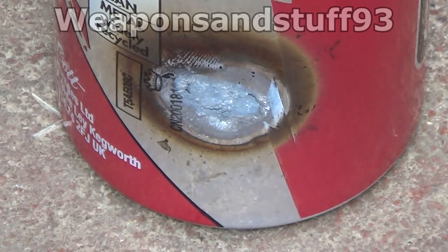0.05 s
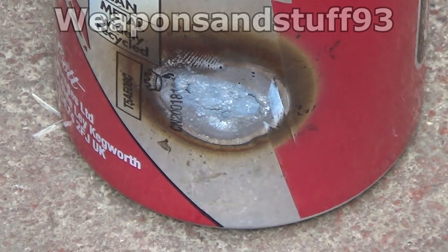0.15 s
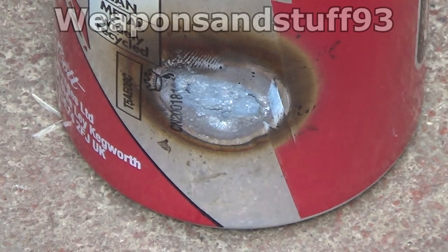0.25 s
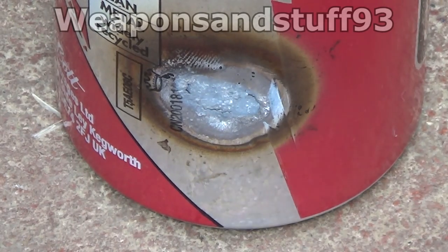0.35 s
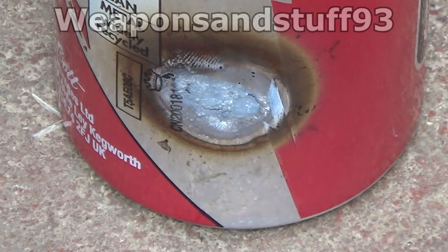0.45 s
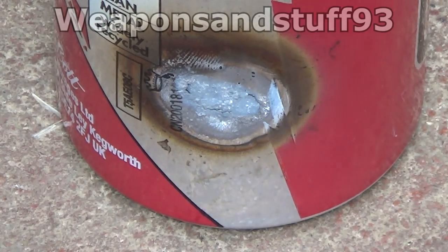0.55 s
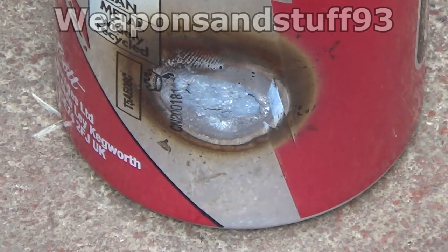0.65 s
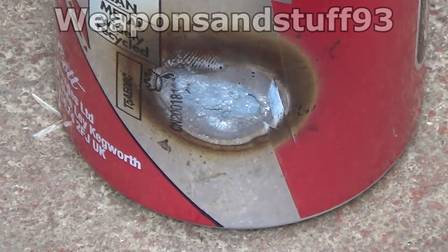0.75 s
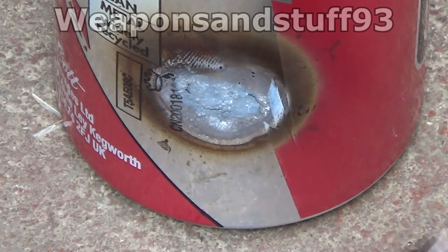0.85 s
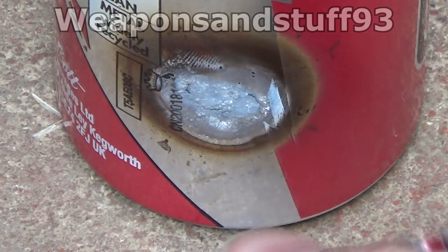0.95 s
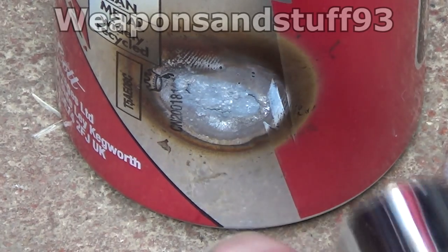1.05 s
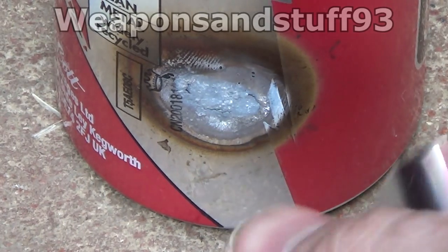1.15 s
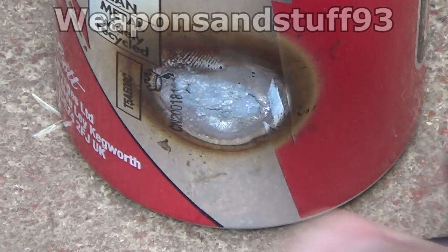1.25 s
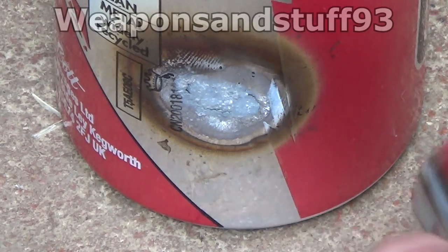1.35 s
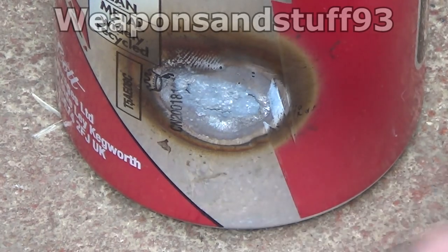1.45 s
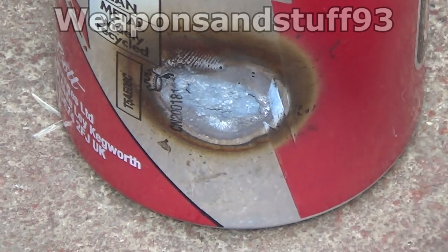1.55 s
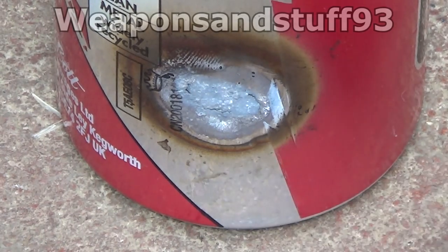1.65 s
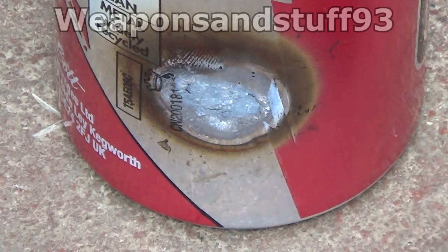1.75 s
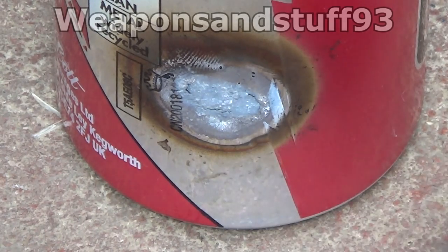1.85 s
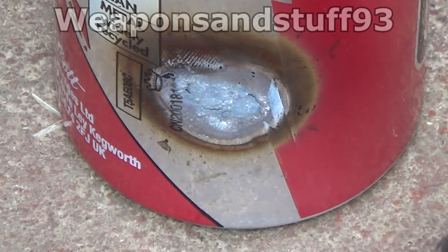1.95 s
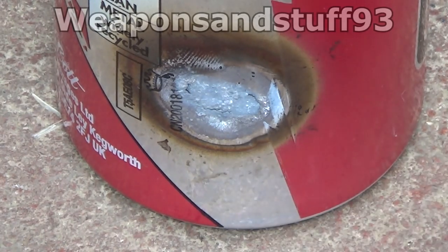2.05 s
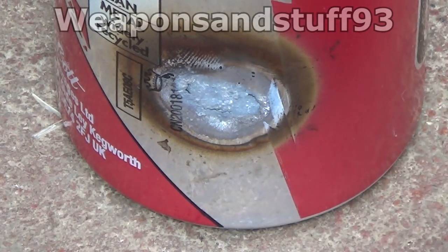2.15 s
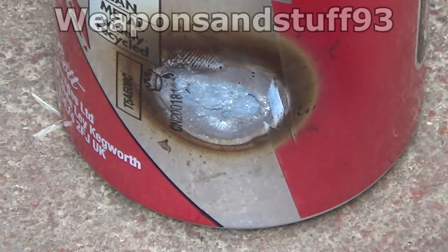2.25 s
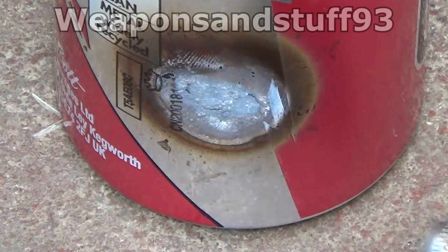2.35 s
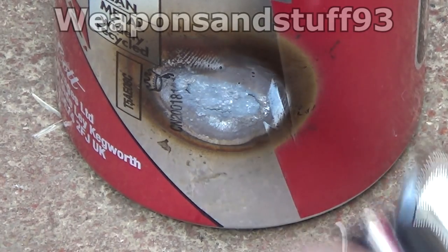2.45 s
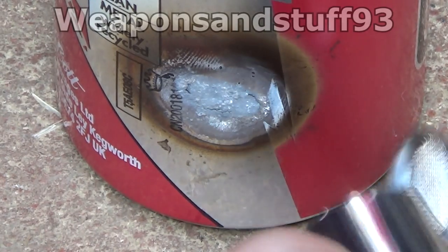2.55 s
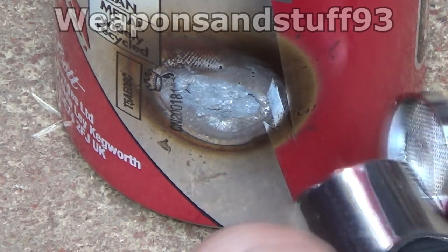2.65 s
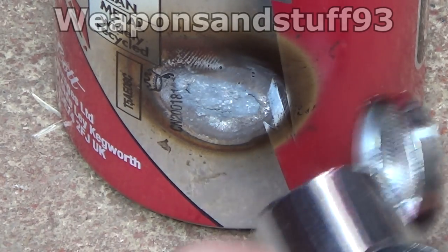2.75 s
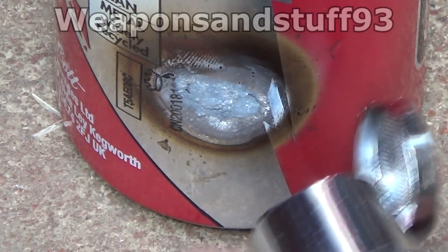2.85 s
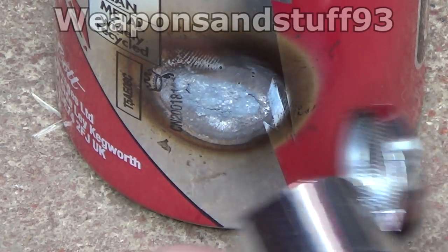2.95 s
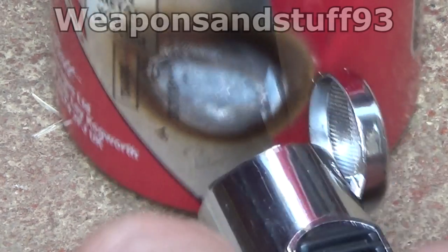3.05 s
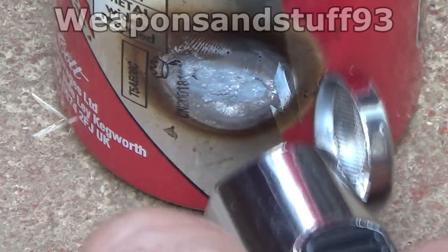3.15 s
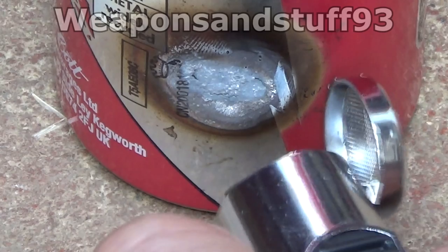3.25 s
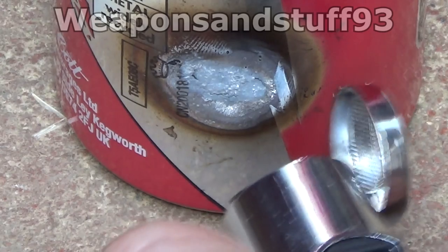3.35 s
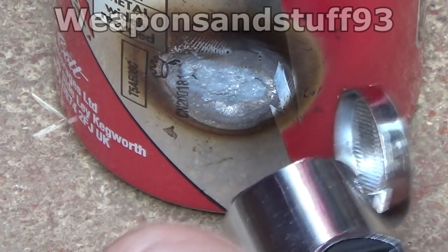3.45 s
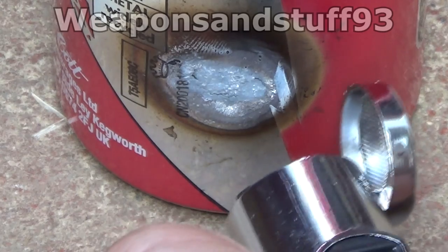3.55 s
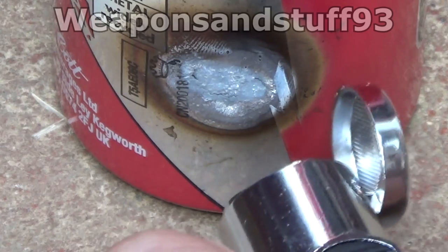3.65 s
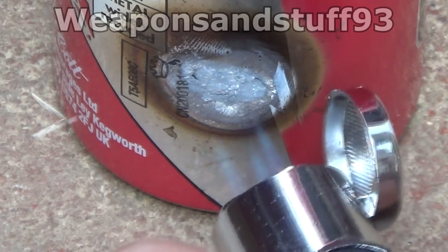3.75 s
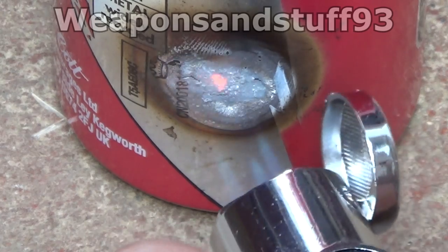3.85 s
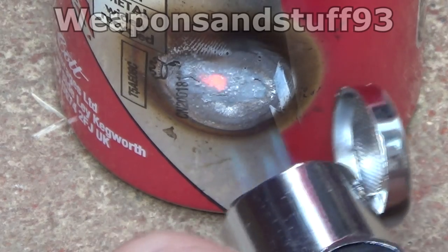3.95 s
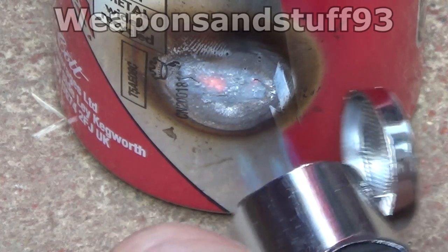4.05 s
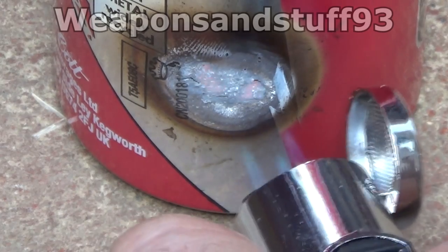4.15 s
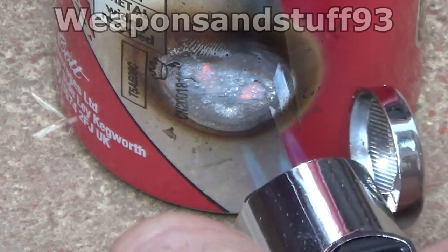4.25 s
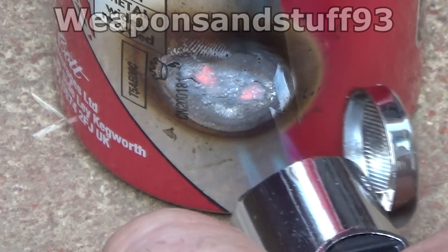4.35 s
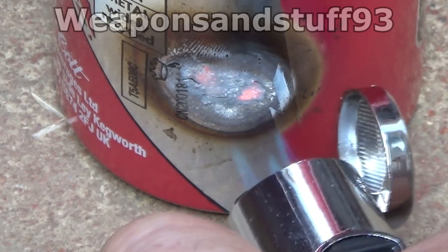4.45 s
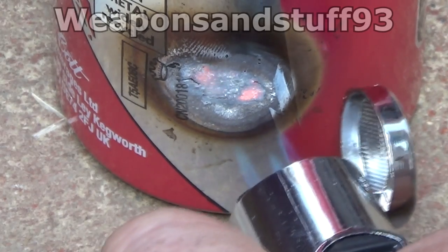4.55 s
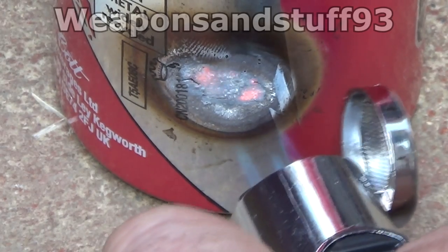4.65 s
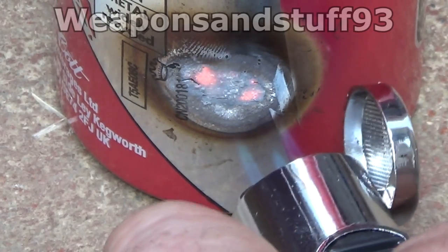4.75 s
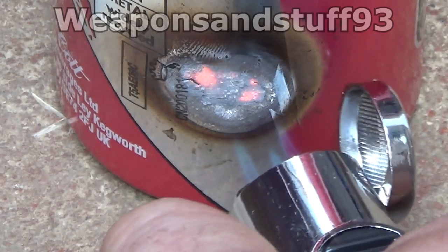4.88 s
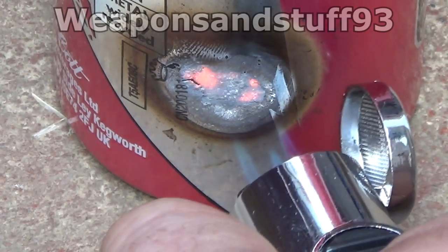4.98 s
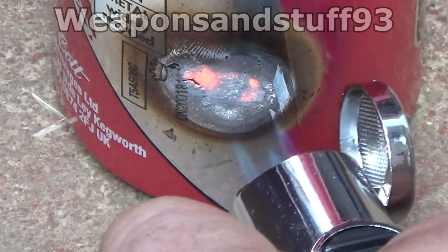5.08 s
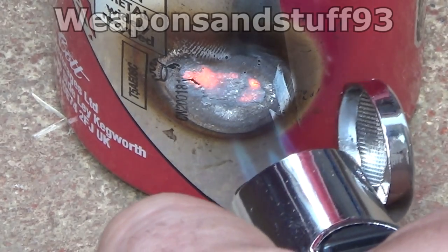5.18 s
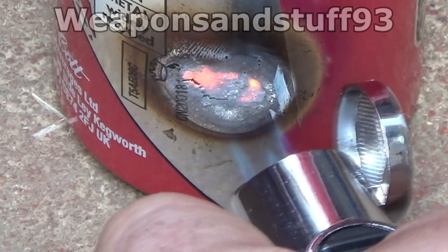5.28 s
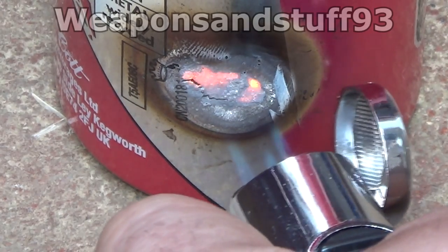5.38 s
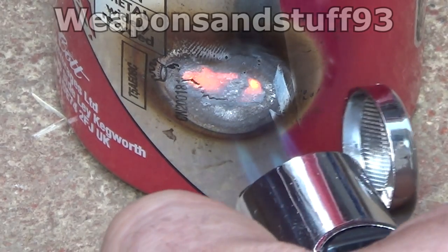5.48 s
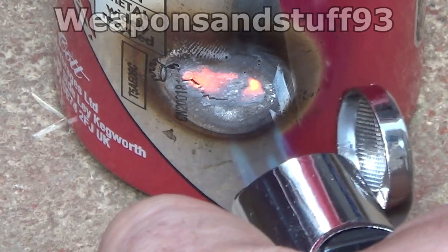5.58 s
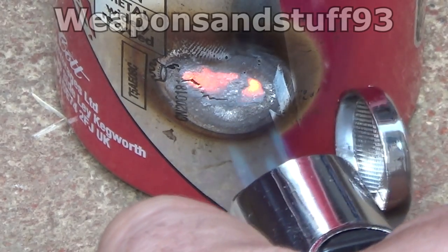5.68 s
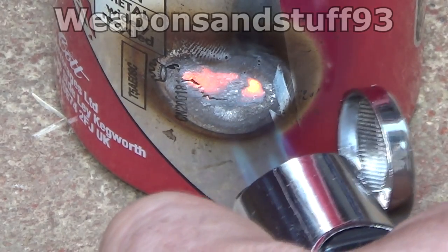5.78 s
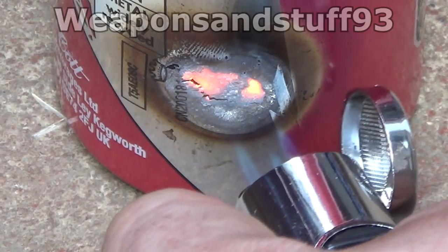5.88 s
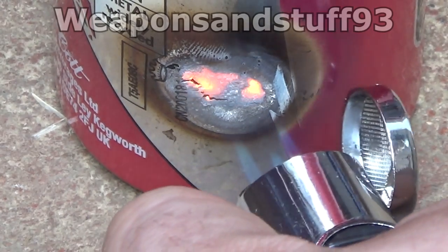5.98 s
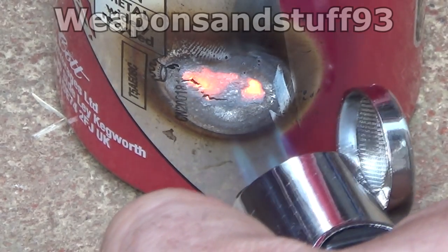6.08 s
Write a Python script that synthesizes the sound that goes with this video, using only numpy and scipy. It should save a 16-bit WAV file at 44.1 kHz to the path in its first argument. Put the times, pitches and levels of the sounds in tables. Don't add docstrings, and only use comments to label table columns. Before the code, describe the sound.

Soft rustling fades over a distant traffic bed while a camera lens motor ticks very faintly. Small dry metallic clicks come irregularly, then a metal lid flicks open with a clattering bounce and brief ring. A thin gas hiss follows, a sharp ignition crackles, and a torch lighter burns with a dense, breathy hiss against a can, close to the microphone.

```python
import sys
import numpy as np
from scipy import signal
from scipy.fft import rfft, irfft, next_fast_len
from scipy.io import wavfile
from scipy.ndimage import uniform_filter1d

SR = 44100
rng = np.random.default_rng(int(sys.argv[2]) if len(sys.argv) > 2 else 0)


def wrap_up_sound(samples):
    columns = np.atleast_2d(samples).T
    tamed = np.clip(columns, -1, 1)
    steps = np.round(tamed * 32767).astype(np.int16)
    wavfile.write(sys.argv[1], SR, steps)


def invert_db(x):
    u = np.asarray(x, float) / 20
    return 10 ** u


N = 269936
T = np.arange(N) / SR
HZ = np.maximum(np.fft.rfftfreq(next_fast_len(N, real=True), 1 / SR), 1)

# time_s, level_db
TRAFFIC = [
    (0, -51.5),
    (1.7, -54.5),
    (2.1, -52),
    (3.0, -53),
    (3.4, -56.5),
    (3.9, -53),
    (5.3, -50.5),
    (5.85, -48),
    (6.12, -49.5),
]
# time_s, above_rest_db
HAND = [(0, 18.5), (.27, 12), (.63, 13.5), (.75, 8), (.83, 1.5), (1.0, 2), (1.45, 0), (1.68, 2), (1.82, 0),
        (2.03, -2.5), (2.3, -0.5), (2.5, 2.5), (2.95, 1.5), (3.08, -0.5), (3.3, 1.5), (3.8, -1.5)]
# rest_db, slope_db_per_db, max_growth_db
RUSTLE = [
    (-58, 1.07, 9.5),
    (-63, 1.15, 25),
    (-67.5, 1.17, 25),
]
# freq_hz, level_db
AROUND_COLOUR = [(12, -45), (20, -14.5), (55, -4.5), (127, -14.5), (146, -27), (255, -16.5), (377, -21),
                 (574, -19), (1150, -27), (2300, -26), (3160, -31.5), (4180, -31.5), (4940, -29.5),
                 (9950, -21), (16000, -36.5)]
PING_FRAMES = [7, 8, 12, 13, 14, 22, 23, 24, 25, 54, 56, 77, 85, 91]
# start_s, length_s, first_hz, last_hz, level_db
SQUEAK = [(1.06, .03, 4900, 5150, -74), (1.22, 0.049, 5150, 5250, -81), (1.285, .045, 5450, 5260, -72),
          (1.333, 0.061, 5270, 5370, -71), (1.413, .045, 4980, 4850, -74), (1.492, 0.082, 5110, 5190, -68),
          (1.59, 0.04, 5160, 5000, -70), (1.642, 0.029, 5040, 5300, -71), (1.685, .06, 5200, 4850, -68),
          (1.75, .03, 4880, 4900, -69), (1.07, .05, 11800, 13300, -80), (1.57, .09, 13050, 12900, -81)]
# start_s, peak_db, centre_hz, ring_db
TICKS = [(0.6405, -28.5, 1620, -15), (0.82, -21, 5600, -14), (0.852, -35, 1500, -15),
         (0.9003, -40, 4110, -12), (0.9526, -37, 3040, -11), (1.0814, -35.5, 2470, -18),
         (1.1003, -27.5, 5650, -24), (1.1638, -42, 2500, -6), (1.3956, -26.5, 4240, -0.5),
         (1.4546, -47, 2010, -12), (1.555, -35.5, 2950, -21), (1.607, -42.5, 2980, -14),
         (1.6294, -46, 5040, -14), (1.6754, -46, 5190, -17), (1.759, -38, 1800, -11),
         (1.7777, -32.5, 4120, -6), (1.798, -35.5, 4140, -14), (1.923, -45, 2970, -12),
         (1.9581, -41, 3440, -16), (2.013, -35, 9800, -4), (2.0494, -44, 3980, -13), (2.08, -37, 4140, -11),
         (2.103, -44, 4140, -9.5), (2.1994, -34, 4120, -6.5), (2.341, -42, 1790, -8),
         (2.35, -31.5, 2430, -8.5), (2.4264, -45, 2460, -8), (2.4418, -39, 3560, -18)]
# freq_hz, level_db, t60_s
SHELL = [(2500, -7.5, 0.032), (4120, -6.5, 0.04), (5870, -8.5, 0.028), (7160, -14, .03), (9900, -2, 0.025)]
# start_s, peak_db, rattle_t60_s, treble_db, bass_db
CAP = [
    (3.113, -20.5, 0.12, -9, -21),
    (3.121, -28, 0.11, -16, -6),
    (3.134, -27.5, 0.1, -15, -13),
    (3.147, -34.5, 0.27, -14, -14),
    (3.197, -28, 0.14, -16, -3.5),
]
# freq_hz, level_db, t60_s
CAN = [(586, 1, .18), (900, -1.5, 1), (1295, 1, 0.67), (1650, 12, 0.24), (2143, -6, 0.46),
       (2340, -12, 0.25), (2410, 1, 0.27), (2750, -8, 0.23), (3418, -13, 0.34), (4340, -11, .25),
       (4400, -6, 0.092), (5577, -15, .3)]
# freq_hz, level_db
CAP_COLOUR = [(88, -41), (150, -16), (662, 1), (745, -13), (854, -3), (1870, -11.5), (2360, 2),
              (3100, -13.5), (4320, -15), (9440, -19.5), (16000, -55)]
# middle_s, half_length_s, level_db
WISPS = [
    (1.396, 0.032, -63),
    (1.525, 0.033, -58),
    (1.623, .02, -73),
    (1.86, 0.046, -62),
    (2.35, .03, -62),
    (2.89, 0.087, -60),
    (3.05, 0.061, -65),
]
# freq_hz, level_db
WISP_COLOUR = [(4500, -22), (7000, -9), (9500, -5), (11500, -11), (15000, -30)]
# freq_hz, level_db
GAS_COLOUR = [(2000, -24), (2700, -8), (3150, -13), (3540, 3), (3830, -9), (4090, -1), (4700, -8),
              (5400, 0), (7200, 0), (7650, -5), (8300, 2), (9700, 2), (10900, -3), (11300, -10)]
# start_s, peak_db, throat_db, t60_s
SPUTTER = [
    (3.8262, -1, -12.5, 0.05),
    (3.8394, -2.5, -9, 0.062),
    (3.8528, -8, -6, 0.057),
    (3.8598, -20, 7, 0.06),
    (3.87, -17, 0, 0.053),
]
# time_s, level_db
CATCH = [
    (3.828, -35),
    (3.86, -19),
    (3.934, -48),
    (4.0, -46),
]
# freq_hz, level_db
CATCH_COLOUR = [(530, -56), (900, -23), (1120, -27), (1530, -23.5), (1720, -21), (2300, -2), (3910, -20),
                (5220, -9), (6640, -11.5), (7960, -3.5), (9420, -0.5), (14200, -28), (16000, -54)]
# time_s, flow_db
FLAME = [
    (3.89, 1.5),
    (4.2, 1.27),
    (5.0, 2.5),
    (5.09, 4),
    (5.37, 3.5),
    (5.5, 4.5),
    (5.84, 3.5),
    (6.12, 3),
]
# level_db, slope_db_per_flow_db, flare_db, dip_db
JETS = [
    (-41, 1.04, 6, -4),
    (-42.5, .75, 2.5, 0.5),
    (-53.5, 1.11, 19, -20),
]
# freq_hz, level_db
FLAME_COLOUR = [(120, -29), (240, -11), (440, -13), (730, -12.5), (930, -10), (1100, -1), (1500, -7.5),
                (2060, -1), (3150, -11), (7200, -6.5), (7700, -10), (9700, -20), (13500, -25.5),
                (16000, -41)]
# freq_hz, width_hz, boost_db
RINGS = [(1100, 120, 2), (1246, 14, 6), (1540, 40, 1.5), (1657, 38, 8), (1766, 22, 8), (2144, 59, 3.5),
         (2290, 48, -1.5), (2643, 170, 6), (3550, 79, 7.5), (4120, 170, 4.5), (5270, 200, 3.5),
         (5900, 160, 2), (7670, 110, -9), (10750, 880, 7.5)]
# freq_hz, side_minus_mid_db
SIDE_NEAR = [(60, -34), (110, -6), (200, -16), (380, -16), (700, -9.5), (1290, -14.5), (2380, -6.5),
             (4400, -9), (8120, -13), (15000, -18)]
# freq_hz, side_minus_mid_db
SIDE_FAR = [(60, -44), (110, -5), (200, -19), (380, -13), (700, -9.5), (1290, -3.5), (2380, -3.5),
            (4400, -6), (8120, -5), (15000, -27)]
# freq_hz, side_minus_mid_db
SIDE_SPARK = [(60, -26), (110, -19), (200, -27), (380, -19), (700, -12), (1290, -12), (2380, -8),
              (4400, -9), (8120, -11), (15000, -25)]

ROOM_T60_S, ROOM_DB = 0.19, -7
DRONE_HZ, DRONE_DB, DRONE_STOPS_S, DRONE_SAG_HZ, DRONE_SAG_S = 61, -48, 1.72, 8.7, 0.26
HAND_PAN_DB, BUSY_PAN_DB = -1.5, -1
LEAK_S, LEAK_RISE_S, LEAK_DB = 2.37, 0.6, 5.5
FRAME_S, FIRST_STEP_S = 0.04, 0.012
PING_DB, PING_HZ, PING_SAG_HZ_PER_S = -51.5, 2940, 48
EDGE_TRIM_DB = 5
GRIP_PAN_DB, LID_PAN_DB, LID_ABOVE_HZ = -2.2, 1.2, 3750
CRACK_DB = -10
SEEP_FROM_S, SEEP_TO_S, SEEP_DB, SEEP_GROWTH_DB = 3.22, 3.815, -51.5, 2.5
FLARE_S, SETTLE_S, FLAME_PAN_DB = 0.0083, 0.054, 0.8
TOP_HZ, PREAMP_DB = 15700, -70


def unit(x):
    return x / np.sqrt(np.mean(x ** 2))


def noise():
    return rng.standard_normal(N)


def sieve(x, gain):
    size = next_fast_len(N, real=True)
    return irfft(rfft(x, size) * gain, size)[:N]


def shape(x, points):
    hz, db = np.transpose(points)
    return sieve(x, invert_db(np.interp(np.log(HZ), np.log(hz), db)))


def split(x, edges_hz):
    lows = [1 / (1 + (HZ / edge) ** 6) for edge in edges_hz] + [1]
    return [sieve(x, high - low) for low, high in zip([0] + lows, lows)]


def curves(rows, fade=0.01):
    s, *columns = np.transpose(rows)
    gate = np.clip(np.minimum(T - s[0], s[-1] - T) / fade + 1, 0, 1)
    return [gate] + [np.interp(T, s, column) for column in columns]


def walk(rate):
    k = int(SR / rate)
    held = np.repeat(rng.standard_normal(N // k + 1), k)
    return uniform_filter1d(uniform_filter1d(held, k), k)[:N]


def fall(t60, seconds=0.41):
    t = np.arange(int(seconds * SR)) / SR
    return t, np.exp(-np.log(1000) * t / max(t60, 0.003))


def ring(modes, seconds=0.41):
    out = 0
    for hz, db, t60 in modes:
        t, env = fall(t60, seconds)
        env = env * np.minimum(t * hz / 2, 1)
        strength = invert_db(db + 3.8 * rng.standard_normal())
        out = out + strength * env * np.sin(2 * np.pi * (hz * t + rng.random()))
    return out


def burst(low_hz, high_hz, t60):
    t, env = fall(t60)
    band = signal.butter(3, [low_hz, min(high_hz, 14000)], "bandpass", fs=SR, output="sos")
    y = signal.sosfilt(band, env * rng.standard_normal(len(t)))
    return y / np.abs(y).max()


def add(track, s, sound, db):
    i = int(s * SR)
    track[..., i:i + sound.shape[-1]] += sound * invert_db(db) / np.abs(sound).max()


def pan(db):
    return invert_db(np.array([[db], [-db]]) / 2)


def room(x, side_colour, wet_db=ROOM_DB):
    t, env = fall(ROOM_T60_S)
    tails = env * np.minimum(t / 0.0038, 1) * rng.standard_normal((2, len(t)))
    tails /= np.sqrt(np.sum(tails ** 2, axis=1, keepdims=True))
    wet, side = signal.fftconvolve(x[None], tails, axes=1)[:, :N]
    mid = (x + invert_db(wet_db) * wet) / np.sqrt(1 + invert_db(2 * wet_db))
    side = shape(side, side_colour)
    return np.array([mid + side, mid - side])


def drone():
    gate, db = curves([(0, DRONE_DB), (DRONE_STOPS_S, DRONE_DB)], fade=0.04)
    sag_hz = DRONE_SAG_HZ * np.exp(np.minimum(T - DRONE_STOPS_S, 0) / DRONE_SAG_S)
    hz = DRONE_HZ * (1 + 0.054 * walk(8.7)) - sag_hz
    return gate * invert_db(db + 2.5 * walk(12)) * np.sin(2 * np.pi * np.cumsum(hz) / SR)


def surroundings():
    _, rumble_db = curves(TRAFFIC)
    _, busy = curves(HAND)
    air = shape(noise(), AROUND_COLOUR)
    edges_hz = [150, 1300, 5200]

    boom = 1 + 0.42 / (1 + ((HZ - 55) / 12) ** 2)
    rumble = unit(sieve(split(air, edges_hz)[0], boom)) * invert_db(rumble_db + 2.3 * walk(6.1))

    rustle_db = [rest_db + np.minimum(slope * busy, most_db) for rest_db, slope, most_db in RUSTLE]
    rustle_db[-1] += LEAK_DB * np.clip((T - LEAK_S) / LEAK_RISE_S, 0, 1)
    left, right = (split(ear, edges_hz)[1:] for ear in room(air, SIDE_FAR))
    grain_db = 1.66 * walk(60)
    rustle = 0
    for a, b, db in zip(left, right, rustle_db):
        rustle = rustle + unit(np.array([a, b])) * invert_db(db + 0.29 * walk(16) + grain_db)
    pan_db = HAND_PAN_DB + BUSY_PAN_DB * np.clip(busy / 10, 0, 1)
    return rumble + rustle * invert_db(np.array([pan_db, -pan_db]) / 2)


def lens():
    out = np.zeros(N)
    step_modes = [(2500, 3, 0.022), (2850, 0, 0.022), (1900, -11, 0.015)]  # freq_hz, level_db, t60_s
    for s in np.arange(FIRST_STEP_S, N / SR - 0.4, FRAME_S):
        add(out, s, ring(step_modes), -60 + 3 * rng.standard_normal())
    for frame in PING_FRAMES:
        s = FIRST_STEP_S + frame * FRAME_S
        hz = PING_HZ - PING_SAG_HZ_PER_S * s
        t, env = fall(0.023)
        ping = env * np.minimum(t / 0.0019, 1) * np.sin(2 * np.pi * hz * t)
        add(out, s, ping, PING_DB + rng.standard_normal())
    return out


def squeak():
    out = 0
    for s, length, first_hz, last_hz, db in SQUEAK:
        gate, hz = curves([(s, first_hz), (s + length, last_hz)])
        hz = hz * (1 + 0.006 * walk(45))
        out = out + gate * invert_db(db + 7.5 + 3.6 * walk(50.1)) * np.sin(2 * np.pi * np.cumsum(hz) / SR)
    return out


def ticks():
    out = np.zeros((2, N))
    for s, db, hz, ring_db in TICKS:
        edge_db = ring_db - EDGE_TRIM_DB + 13
        snap = burst(hz / 2.48, hz * 1.51, 0.014) + invert_db(edge_db) * burst(5900, 12300, 0.0072)
        tail = 0.35 * burst(hz / 1.14, hz * 1.047, 0.042)
        rings = 0
        for f, mode_db, t60 in SHELL:
            mode_db = mode_db - 10 * abs(np.log2(f / hz))
            rings = rings + invert_db(mode_db) * burst(f / 1.02, f * 1.02, t60)
        pan_db = LID_PAN_DB if hz > LID_ABOVE_HZ else GRIP_PAN_DB
        add(out, s, (snap + tail + invert_db(ring_db + 4.5) * rings) * pan(pan_db), db)
    return out


def cap():
    dull, middle, bright, steel = np.zeros((4, N))
    for s, db, t60, treble_db, bass_db in CAP:
        add(dull, s, fall(t60)[1], db + bass_db - 5)
        add(middle, s, fall(t60)[1], db - 23.5)
        add(bright, s, fall(0.88 * t60)[1], db + treble_db - 5)
        modes = [(hz * twin, mode_db + bass_db * (hz < 1700), mode_t60)
                 for hz, mode_db, mode_t60 in CAN for twin in (1, 1.017)]
        add(steel, s, burst(700, 2900, 0.012), db + CRACK_DB + bass_db / 2)
        add(steel, s, ring(modes, seconds=0.45), db - 9.5)
    bands = split(shape(noise(), CAP_COLOUR), [1700, 3100])
    return steel + sum(env * unit(band) for env, band in zip((dull, middle, bright), bands))


def gas():
    gate, db = curves([(SEEP_FROM_S, SEEP_DB), (SEEP_TO_S, SEEP_DB + SEEP_GROWTH_DB)], fade=0.035)
    seep = gate * invert_db(db + 1.2 * walk(20)) * unit(shape(noise(), GAS_COLOUR + [(16000, -21)]))
    wisps = sum(invert_db(db) * np.exp(-((T - s) / half) ** 4) for s, half, db in WISPS)
    return seep + wisps * unit(shape(noise(), WISP_COLOUR))


def ignition():
    throat, bright = split(unit(shape(noise(), CATCH_COLOUR)), [4200])
    low_env, high_env, spark = np.zeros((3, N))
    for s, db, throat_db, t60 in SPUTTER:
        add(high_env, s, fall(t60)[1], db - 18)
        add(low_env, s, fall(t60)[1], db + throat_db - 15.5)
    gate, db = curves(CATCH, fade=0.00055)
    high_env += gate * invert_db(db - 8.5 + 3 * walk(200))
    add(spark, SPUTTER[0][0], burst(1900, 11500, 0.022), -10)
    puff = burst(120, 340, 0.21) * np.minimum(fall(1)[0] / 0.014, 1)
    add(spark, 3.832, puff, -38)
    return high_env * unit(bright) + low_env * unit(throat) + spark


def flame():
    gate, flow = curves(FLAME, fade=0.064)
    lit_s = np.maximum(T - FLAME[0][0], 0)
    flare, dip = np.exp(-lit_s / FLARE_S), np.exp(-lit_s / SETTLE_S)
    boost = 1 + sum((invert_db(db) - 1) / (1 + (2 * (HZ - hz) / width) ** 2) for hz, width, db in RINGS)
    jet = sieve(shape(noise(), FLAME_COLOUR), boost)
    flutter_db = 0.45 * walk(30)
    out = 0
    for band, (db, slope, flare_db, dip_db) in zip(split(jet, [3050, 7700]), JETS):
        band_db = db + slope * flow + flare_db * flare + dip_db * dip
        out = out + unit(band) * invert_db(band_db + flutter_db + 0.31 * walk(9.2))
    return gate * out


def scene():
    around = drone() + surroundings() + lens()
    left, right = ticks()
    handling = room((left + right) / 2 + cap() + squeak() + gas(), SIDE_NEAR)
    handling += np.array([left - right, right - left]) / 2
    jets = room(flame(), SIDE_NEAR, wet_db=-6) * pan(FLAME_PAN_DB)
    return around + handling + room(ignition(), SIDE_SPARK) + jets


def top_cut(x):
    return signal.sosfilt(signal.butter(12, 16510, fs=SR, output="sos"), x)


def record(dry):
    hiss = invert_db(PREAMP_DB) * unit(np.diff(rng.standard_normal(N + 1)))
    low_pass = signal.ellip(10, 0.2, 60, TOP_HZ, fs=SR, output="sos")
    mix = signal.sosfilt(low_pass, dry + hiss)
    return top_cut(mix)


dry = scene()
out = record(dry)
wrap_up_sound(out)
```